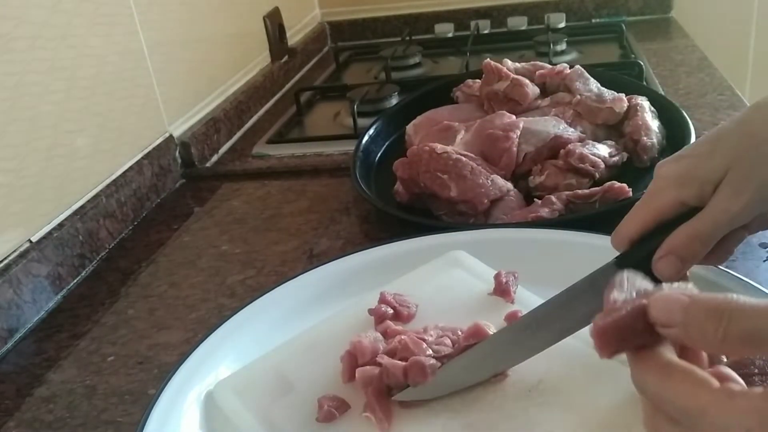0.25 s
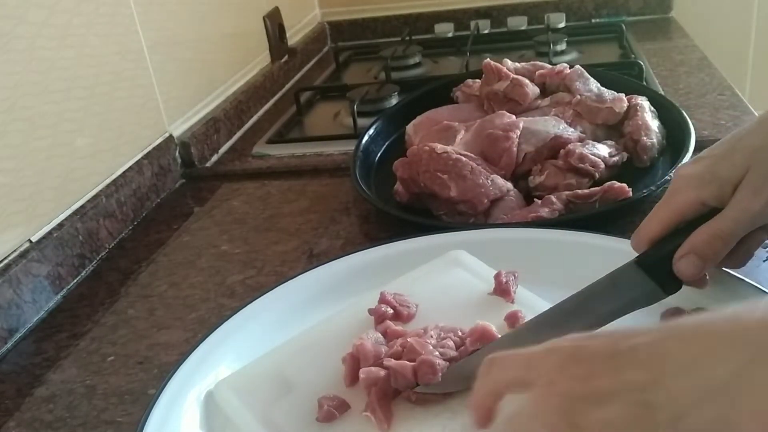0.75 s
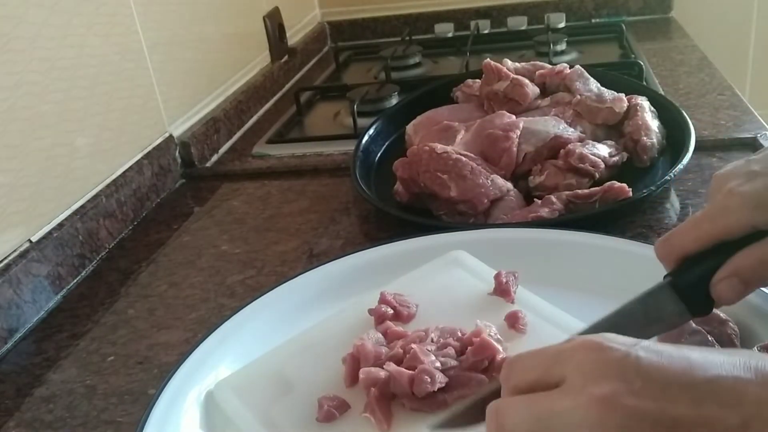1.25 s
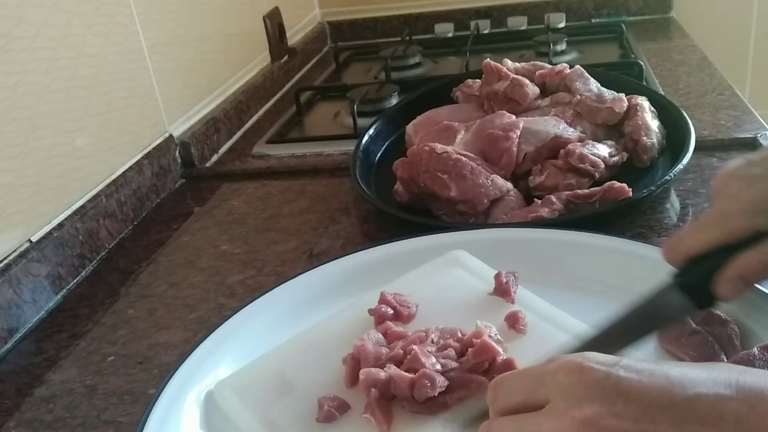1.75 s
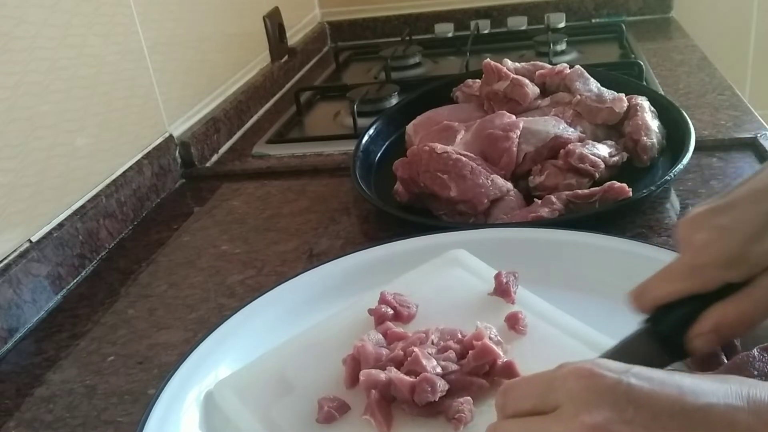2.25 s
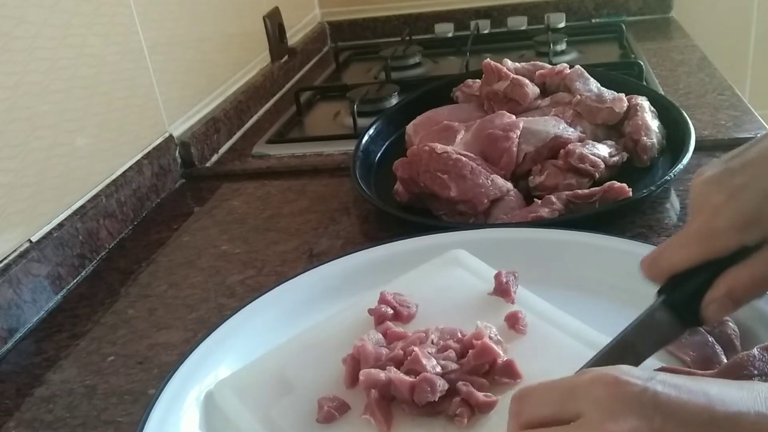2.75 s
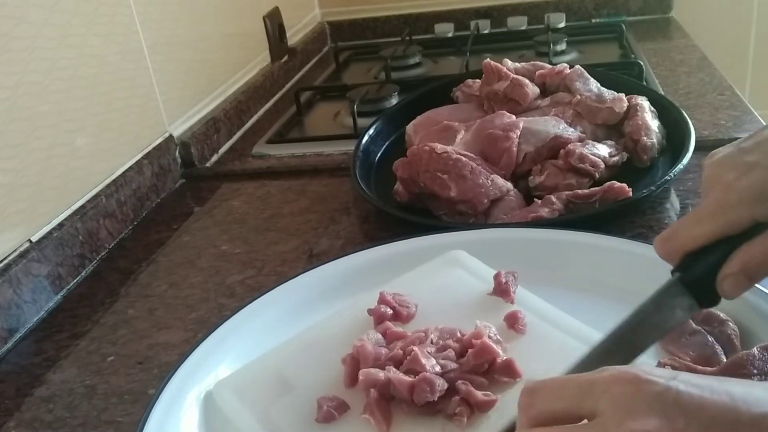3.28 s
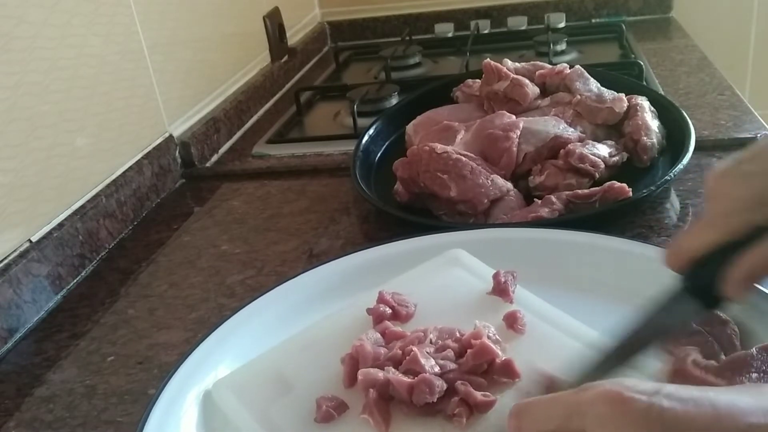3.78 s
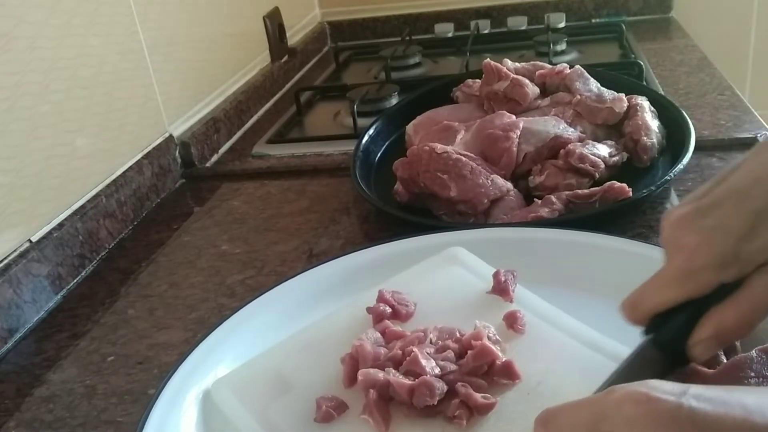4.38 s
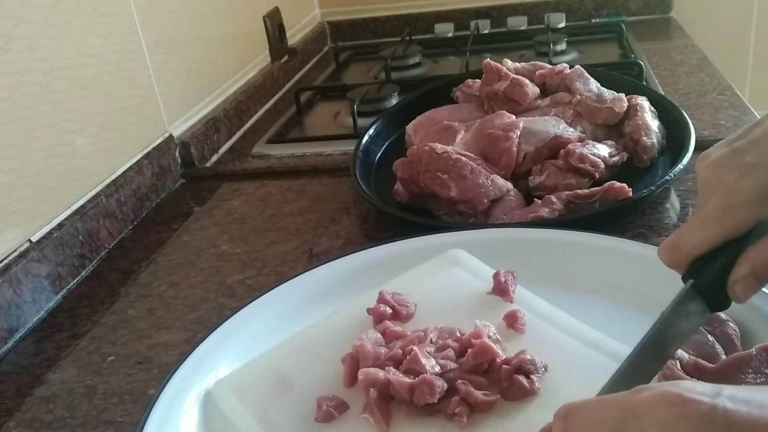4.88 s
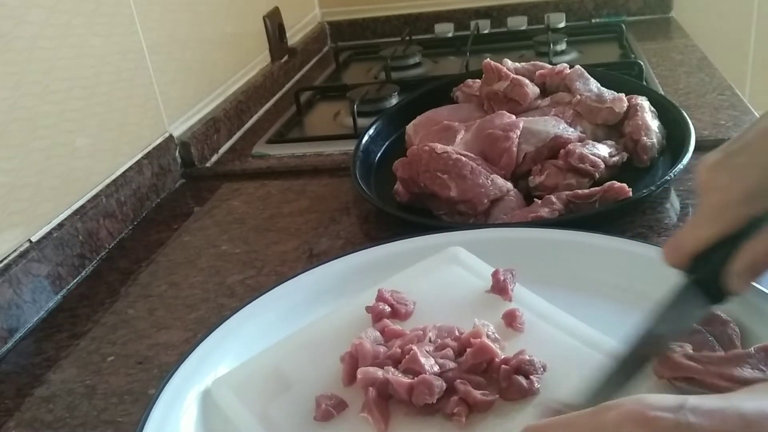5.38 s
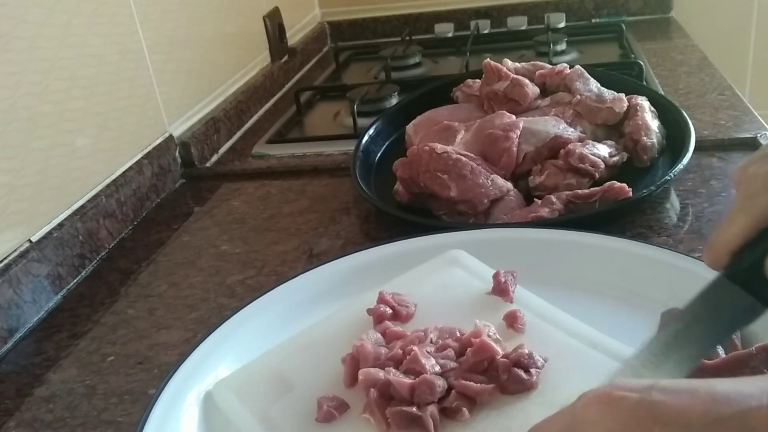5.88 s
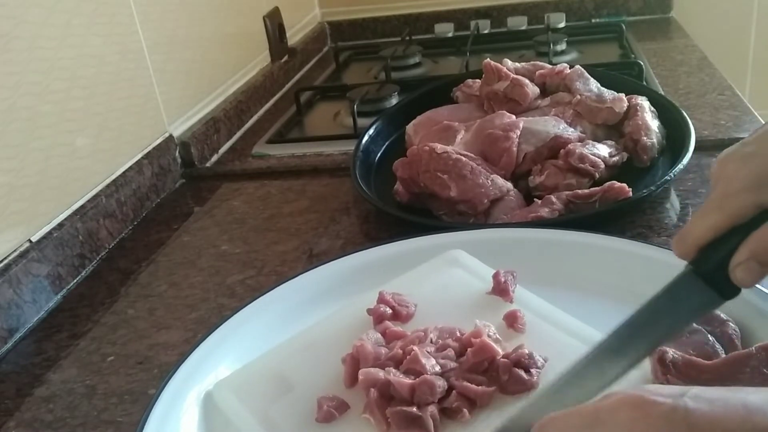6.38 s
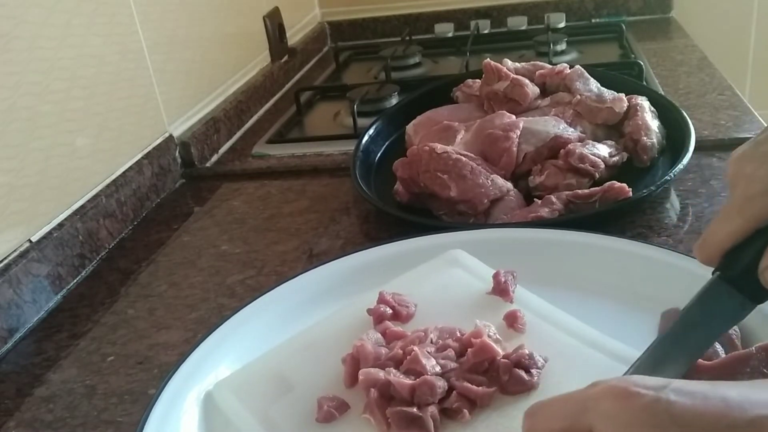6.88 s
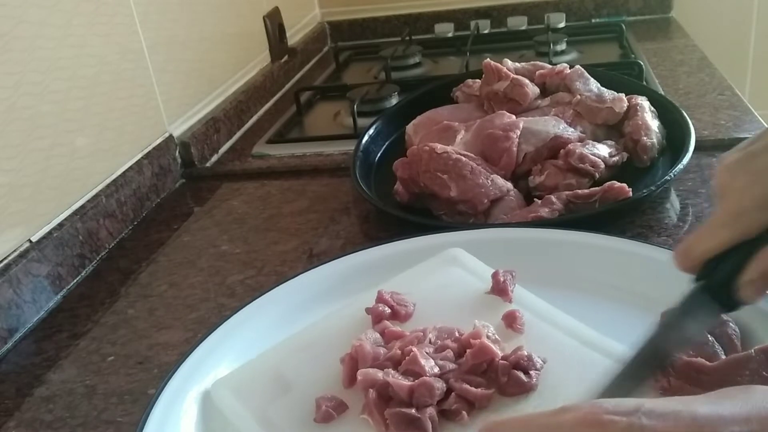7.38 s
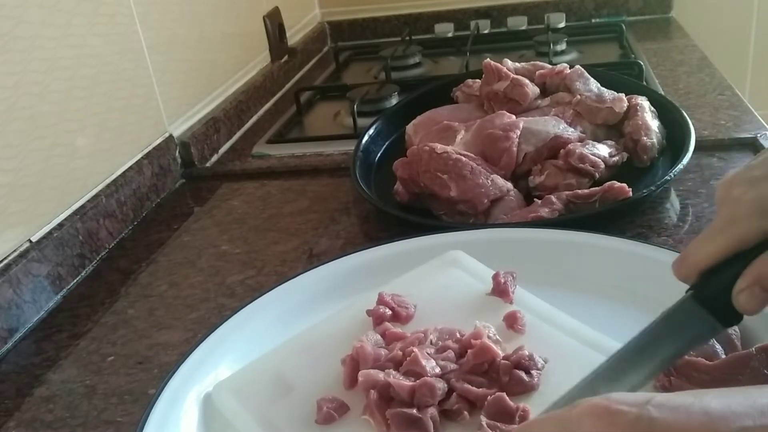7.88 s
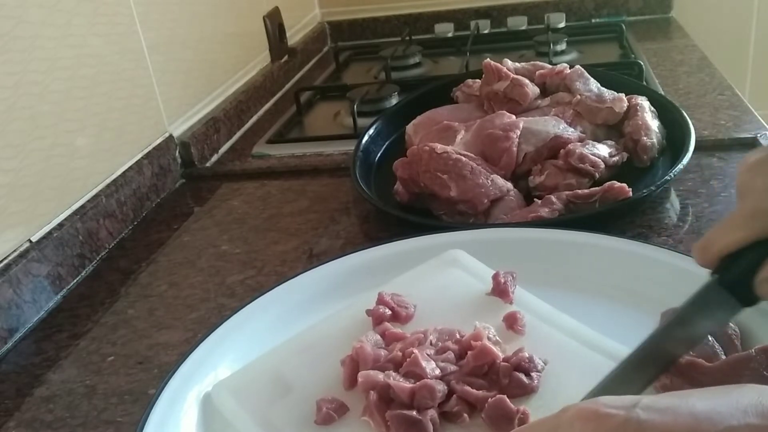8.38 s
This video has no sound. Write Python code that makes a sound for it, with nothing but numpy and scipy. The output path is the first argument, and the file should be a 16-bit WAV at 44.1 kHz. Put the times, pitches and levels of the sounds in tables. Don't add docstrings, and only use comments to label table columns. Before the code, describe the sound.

A constant low refrigerator hum with a thin whine and airy fan noise sits under close knife work. The blade knocks the board at once, then saws meat in short wet hisses, finishing in dry taps and little rattles. Soft low hand bumps come between. The cutting lulls with slight sticky rustling, then two louder chops finish it. Small hard-walled room, slightly thin phone sound.

```python
import sys
import numpy as np
from scipy import signal
from scipy.fft import rfft, irfft
from scipy.io import wavfile
from scipy.ndimage import uniform_filter1d

SR = 44100
rng = np.random.default_rng(int(sys.argv[2]) if len(sys.argv) > 2 else 0)


def ratio(d):
    e = np.asarray(d, float) / 20
    return 10 ** e


def inscribe(sig):
    pcm = np.round(np.clip(np.atleast_2d(sig).T, -1, 1) * 32767)
    wavfile.write(sys.argv[1], SR, pcm.astype(np.int16))


N = 381024
T = np.arange(N) / SR

# (full bite [s], edge chatter [dB], board minus chatter [dB],
# tray minus chatter [dB], contact [s])
BLADE_LANDINGS = [(0.012, -42, -2, 10, 0.012), (1.742, -44.5, 3, 9.5, 0.0042), (2.156, -50, -0.5, 9, 0.011),
                  (2.424, -41, 3, 3, 0.015), (2.816, -50, 5, 8, 0.0054), (3.09, -37, 4, -6, 0.012),
                  (3.485, -47.5, -6, -9, 0.014), (3.771, -39.5, -3.5, -5, 0.0072),
                  (4.596, -37.5, 1.5, -2, 0.0065), (5.046, -52.5, 10.5, 14, 0.0058),
                  (5.252, -49, -5, -23, 0.0068), (5.373, -41.5, 1.5, 2.5, 0.01),
                  (7.392, -32, -1.5, -1, 0.01), (8.436, -26.5, -2.5, 1, 0.0097)]
# (frequency [Hz], level [dB], t60 [s])
BOARD_MODES = [(630, -8, .12), (720, -12, .1), (806, -13, .08), (1071, -9, .1), (1163, -2, .1),
               (1252, -2, .1), (1343, 1, .12), (1420, -2, .1), (1520, -4, .1), (1600, -6, .1),
               (1690, -8, .09), (1840, -12, .08), (2100, -7, .1), (2300, -14, .07), (2450, -15, .07),
               (2700, -14, .1), (3180, -17, .06), (3380, -17, .06), (3670, -11, .06), (3980, -17, .06),
               (4600, -19, .05), (4980, -19, .05)]
# (frequency [Hz], level [dB], t60 [s])
TRAY_MODES = [(816, -11, 0.17), (867.6, -7.5, 0.36), (899, -1.5, 0.32), (930, -2, 0.35), (968, -7.5, 0.36),
              (994.5, -5.5, 0.33), (1070, -13, 0.31)]


def on_log(table, hz):
    f, v = np.transpose(table)
    return np.interp(np.log(np.maximum(hz, 1)), np.log(f), v)


def colour(x, table):
    n = x.shape[-1]
    return irfft(rfft(x) * ratio(on_log(table, np.fft.rfftfreq(n, 1 / SR))), n)


def unit(x):
    return x / np.sqrt(np.mean(x ** 2))


def even(x):
    return x / np.sqrt(np.mean(x ** 2, axis=1, keepdims=True))


def walk(rate):
    k = int(SR / rate)
    steps = np.repeat(rng.standard_normal(N // k + 1), k)
    return unit(uniform_filter1d(uniform_filter1d(steps, k), k)[:N])


def grit(shape, scatter_db):
    size_db = scatter_db * np.minimum(rng.exponential(size=shape), 5)
    return unit(rng.standard_normal(shape) * ratio(size_db))


def ring(modes, damp):
    hz, db, t60 = np.transpose(modes)[:, :, None]
    t = T[:SR // 2]
    chance = rng.standard_normal((2, 3, len(modes), 1))
    weight_db, detune, phase = 2.5 * chance[:, 0], 1 + 0.0035 * chance[0, 1], 2 * chance[:, 2]
    decay = ratio(db + weight_db - 60 * t / (damp * t60))
    out = (decay * np.sin(2 * np.pi * hz * detune * t + phase)).sum(axis=1)
    return out / np.sqrt((out ** 2).sum(axis=1).mean())


def add(out, sound, s):
    i = int(round(s * SR))
    part = sound[:, max(-i, 0):N - i]
    out[:, max(i, 0):i + sound.shape[1]] += part


def compressor():
    # (multiple of shaft rate [1], left [dB], right [dB])
    strong_orders = [(10, -68, -81), (11, -73, -79), (12, -64, -59), (14, -78, -76), (15, -76, -75),
                     (16, -82, -67), (18, -81, -79), (54, -69, -70), (55, -86, -69), (57, -67, -65),
                     (58, -75, -81), (61, -66, -69), (62, -66, -70), (63, -72, -70), (68, -73, -73),
                     (74, -77, -80), (75, -71, -80), (76, -75, -81), (82, -80, -78), (126, -83, -78)]
    # (frequency [Hz], level [dB])
    valve_slap = [(900, -100), (2200, -97.5), (2900, -95), (4200, -83), (5200, -96), (6300, -90),
                  (7500, -87.5), (9300, -88), (11300, -85.5), (12000, -100)]
    # (time [s], level [dB])
    shell_level = [(0, -57), (1, -55.5), (2, -54.5), (3.2, -55), (4.2, -54.5), (5, -62.5), (5.6, -60),
                   (7, -59), (8.64, -58.5)]
    shaft_hz = 48.835
    turn = (shaft_hz * T + 0.00039 * walk(1.68)) % 1
    k = np.arange(513)
    scatter = rng.standard_normal(513) + 0.34 * rng.standard_normal((2, 513))
    db = on_log(valve_slap, k * shaft_hz) + 4 * np.clip(scatter, -3, 1.3)
    db[:, :10] = -200
    for order, left, right in strong_orders:
        db[:, order] = left - .5, right - .5
    db[:, 13] = -200
    spread = np.minimum(k / 75, np.where(k < 140, 1, .5))
    angle = k / 60 * rng.standard_normal(513) + spread * rng.standard_normal((2, 513))
    strong = [row[0] for row in strong_orders]
    angle[1, strong] += .7 * (angle[0, strong] - angle[1, strong])
    cycle = irfft(ratio(db) * np.exp(1j * angle), 16384) * 8192 * np.sqrt(2)
    comb = cycle[:, (turn * 16384).astype(int)] * ratio(2.04 * walk(8.2))
    shell = ratio(np.interp(T, *np.transpose(shell_level))) * np.sqrt(2)
    shell = shell * np.cos(2 * np.pi * 13 * turn + np.array([[.2], [-.2]]))
    gas = unit(colour(rng.standard_normal((2, N)), [(2300, -13.0), (2600, -6.5), (2800, -3.5), (2990, 9.0),
                                                    (3110, -3), (3250, -22), (4000, -18.5)]))
    puffs = ratio(-59.0) * gas * (1 + 0.17 * np.cos(2 * np.pi * turn))
    return comb + shell * ratio([[-2.6], [2.1]]) + puffs


def fan():
    # (time [s], level [dB])
    blade_level = [(0.0, -53), (0.04, -49), (0.38, -53), (1.08, -51.5), (2.98, -52.5), (3.51, -58.5),
                   (3.58, -53.5), (4.71, -55.5), (5.25, -49), (5.34, -52), (8.59, -51.5), (8.64, -53)]
    # (frequency [Hz], width [Hz], level [dB])
    duct_modes = [(52.6, 3.5, -61.5), (40, 13, -78), (101.7, 16, -63.5), (150.3, 13, -63.5),
                  (198.6, 22, -62.5), (260, 32, -59.5), (299.4, 11, -58.5)]
    # (frequency [Hz], density [dB per Hz])
    air_noise = [(20, -81), (33, -75), (78, -91), (130, -80.5), (300, -88), (330, -88), (700, -93),
                 (1900, -107), (2950, -103), (3600, -104), (5200, -108), (9000, -100), (11600, -103),
                 (11900, -112), (15500, -115)]
    # (frequency [Hz], left-right correlation [0-1])
    port_likeness = [(60, .95), (200, .94), (400, .75), (1000, .2), (4500, .15), (7000, .75), (15000, .85)]
    blade_hz = 134.1
    hz = np.fft.rfftfreq(N, 1 / SR)
    power = ratio(2 * on_log(air_noise, hz))
    for centre, width, db in duct_modes:
        power = power + ratio(2 * db) / width * np.exp(-np.pi * ((hz - centre) / width) ** 2)
    like = np.clip(on_log(port_likeness, hz), 0, 1)
    mid, side = rfft(rng.standard_normal((2, N))) * np.sqrt(power * SR / 4)
    air = irfft(np.sqrt(1 + like) * mid + np.sqrt(1 - like) * side * np.array([[1], [-1]]), N)
    phase = 2 * np.pi * np.cumsum(blade_hz + 0.55 * walk(5.06)) / SR
    blade_db = np.interp(T, *np.transpose(blade_level)) + 0.68 * walk(13) + 1.25 * walk(4.5)
    blade = np.sin(phase + np.array([[.15], [0]])) * np.sqrt(2) * ratio(blade_db)
    return (air * ratio(1.0 * walk(3.27)) + blade) * ratio([[-.6], [.6]])


def thuds():
    # (time [s], peak [dB], frequency [Hz], t60 [s])
    bumps = [
        (0.751, -40, 44.6, 0.22),
        (1.63, -39, 50, .2),
        (2.3, -37, 40, 0.31),
        (4.29, -42, 45.7, .2),
        (5.03, -41, 68, .2),
        (5.05, -42.5, 105.4, 0.59),
        (8.0, -38, 48, .25),
    ]
    out, t = np.zeros((2, N)), T[:SR // 2]
    for s, db, hz, t60 in bumps:
        bump = np.sin(2 * np.pi * hz * t) * (1 - np.exp(-t / 0.0034)) * ratio(-60 * t / t60)
        add(out, ratio(db) * np.outer(ratio([-1, 1]), bump), s)
    return out


def rustles():
    # (centre [s], peak [dB], colour [Hz], length [s])
    slides = [
        (1.12, -63, 9000, .06),
        (1.3, -56, 9000, .05),
        (6.08, -46.5, 4700, 0.041),
        (6.239, -45.5, 9500, .04),
        (6.785, -48.5, 4800, 0.088),
    ]
    out, t = np.zeros((2, N)), T[:SR // 5]
    for s, db, hz, length in slides:
        rustle = grit((2, len(t)), 2.0) * np.exp(-((t - t.mean()) / length) ** 2)
        add(out, ratio(db) * colour(rustle, [(hz / 2.2, -25), (hz, 0), (hz * 1.36, -20)]), s - t.mean())
    return out


def ticks():
    # (time [s], peak [dB], colour [Hz])
    edge_ticks = [(0.012, -20, 1790), (.587, -38, 9000), (.7225, -45, 5000), (0.7416, -22, 2500),
                  (1.4563, -22.5, 10000), (1.6, -30, 4000), (1.7405, -27, 1800), (2.1238, -27.5, 8400),
                  (2.424, -26, 2000), (3.088, -22, 1800), (3.0965, -31, 2200), (3.768, -41, 2500),
                  (4.593, -28, 1800), (4.599, -37, 2200), (5.041, -36, 2000), (5.047, -40, 2000),
                  (5.375, -36, 2000), (7.014, -35, 8500), (7.3942, -21, 2000), (8.4325, -21, 2000)]
    out, t = np.zeros((2, N)), T[:SR // 5]
    for s, db, hz in edge_ticks:
        noise = rng.standard_normal(len(t)) + .5 * rng.standard_normal((2, len(t)))
        click = noise * (np.exp(-t / .001) + .12 * np.exp(-t / .008))
        tone = [(hz / 16, -45), (hz / 4, -16), (hz, 0), (hz * 3.7, -9), (hz * 5.7, -25)]
        add(out, ratio(db - 2.5) * colour(click, tone)[:, :SR // 10], s)
    return out


def sawing():
    # (fastest moment [s], fibre hiss [dB], board rumble minus hiss [dB],
    # speed-up [s], slow-down [s])
    strokes = [(0.749, -45.5, -1, 0.013, 0.012), (.795, -50.5, -6, 0.036, 0.032),
               (.92, -60, -2, 0.071, .08), (1.46, -50.5, -14, .015, 0.029), (1.505, -53.5, 2, 0.019, .03),
               (1.605, -44.5, -11, 0.053, 0.059), (2.15, -46, -3.5, 0.032, 0.042),
               (2.27, -44.5, -8.5, 0.038, .075), (2.812, -46, -0.5, 0.037, 0.035),
               (2.95, -46, -13, 0.092, 0.072), (3.486, -45.5, -2, 0.056, 0.029),
               (3.61, -45, -10.5, 0.048, 0.073), (4.296, -42.5, -9, 0.037, 0.033),
               (4.45, -45, -8.5, 0.073, 0.078), (5.042, -45.5, 0.5, .04, 0.031),
               (5.24, -47, -7.5, 0.1, 0.083), (7.07, -52.5, -8, 0.046, .035), (7.21, -44, -9, .05, 0.049),
               (8.085, -51.5, -7.5, 0.033, 0.033), (8.27, -50, -3, 0.091, 0.05)]
    # (frequency [Hz], density [dB per Hz])
    fibre_colour = [(800, -4), (2400, -4), (3500, -4), (6700, -2.5), (8600, 2.5), (11500, -5),
                    (15500, -13.5)]
    point, drop_db = 1.93, -8.5
    dive_db, dive_s = -9.5, 0.017
    hiss, rub = np.zeros((2, N))
    for s, hiss_db, board_db, rise, fall in strokes:
        u = np.abs(T - s) / np.maximum(np.where(T < s, rise, fall), .003)
        speed = ratio(hiss_db + drop_db * u ** point)
        hiss = hiss + speed
        rub = rub + ratio(board_db) * speed
    for s, db, *_ in BLADE_LANDINGS:
        hiss = hiss + ratio(db + dive_db) * np.exp(np.minimum(T - s, 0) / dive_s) * (T < s)
    hiss = uniform_filter1d(hiss, 300) * ratio(2.33 * walk(40) + 1.75 * walk(150))
    rub = uniform_filter1d(rub, 300) * ratio(2.33 * walk(40) + 1.75 * walk(150))
    body = ring(BOARD_MODES, 0.88) + ratio(-4) * ring(TRAY_MODES, 0.61)
    board = signal.fftconvolve(rub * grit((1, N), 4.1), body, axes=1)[:, :N]
    fibres = unit(colour(grit((2, N), 2.9), fibre_colour))
    return hiss * fibres * ratio(1.5) + board * ratio(-0.5)


def landings():
    # (frequency [Hz], density [dB per Hz])
    chatter_colour = [(250, -58), (600, -11), (1500, -9.5), (2650, -12), (3900, -11.5), (7400, -14),
                      (8700, -11), (12000, -21), (15500, -29)]
    lead, blow_lead = .04, .005
    drag_base_db, drag_per_db, usual_db = -13, 0.5, -39.5
    held_s, held_db = .066, -11
    out = np.zeros((2, N))
    t = T[:SR // 4] - lead
    slips = ratio(0.37 * walk(70))
    for s, db, board_db, tray_db, contact in BLADE_LANDINGS:
        u = t / np.clip(contact, .003, .05)
        attack = np.exp(-(u / 0.85) ** 2) + 0.046 * np.exp(u / 0.66)
        bite = np.where(u < 0, attack, np.exp(-(np.abs(u) / 1.06) ** 2))
        drag = ratio(drag_base_db + drag_per_db * (db - usual_db)) * np.clip(u, 0, 1) / (1 + (t / 0.042) ** 4)
        drag = drag * slips[int(s * SR / 2):][:len(t)]
        clicks = grit((3, len(t)), 2.1)
        blow = clicks[2:] * (bite ** 1.85 + 0.68 * drag)
        board = even(signal.fftconvolve(blow, ring(BOARD_MODES, 0.54), axes=1)[:, :len(t)])
        tray = even(signal.fftconvolve(blow, ring(TRAY_MODES, 1.0), axes=1)[:, :len(t)])
        mute = ratio(held_db * (s < held_s) * np.clip((t + s - held_s) / .012, 0, 1))
        tray = tray * mute * np.clip((t[-1] - t) / lead, 0, 1)
        chatter = even(colour(clicks[:2] * (bite + drag), chatter_colour))
        add(out, ratio(db - 6.0) * chatter, s - lead + .002)
        body = ratio(board_db) * board + ratio(tray_db - 3.5) * tray
        add(out, ratio(db - 5) * body, s - lead - blow_lead)
    return out


def kitchen(x):
    t60, level_db = 0.4, -11.5
    t = T[:SR // 2]
    tail = rng.standard_normal((2, len(t))) * (1 - np.exp(-t / 0.0039))
    dull = colour(tail, [(300, 18), (1000, 4.5), (4000, 10.0), (9000, -10)])
    tail = dull * ratio(-60 * t / t60) + 1.7 * tail * ratio(-60 * t / (1.51 * t60))
    tail = tail / np.sqrt((tail ** 2).sum(axis=1, keepdims=True))
    return x + ratio(level_db) * signal.fftconvolve(x, tail, axes=1)[:, :N]


def ports(x):
    # (frequency [Hz], level [dB])
    side_width = [(300, 0), (1000, -2), (4000, -1), (7000, -5), (10000, -5.5), (15000, -3)]
    # (frequency [Hz], level [dB])
    port_balance = [(500, 0), (2000, 0.1), (4000, 0), (8000, -2.5), (13000, 0.5)]
    mid, side = x[0] + x[1], colour(x[0] - x[1], side_width)
    hz, db = np.transpose(port_balance)
    left = colour(mid + side, np.transpose([hz, db / 2]))
    right = colour(mid - side, np.transpose([hz, -db / 2]))
    return np.array([left, right]) / 2


def scene():
    knife = landings() + ticks() + rustles() + sawing()
    return ports(kitchen(knife)) + thuds() + compressor() + fan()


def starve(x, depth_db):
    thin_bands = [3900, 4300, 4700, 5150, 5500, 6650, 7200, 7600, 10050, 11850, 12300, 13400, 14500]
    top_hz = 15830
    loud_db, loud_top_hz, loud_frames = -27, 14300, 7
    hz, s, z = signal.stft(x, SR, nperseg=2048)
    chance = rng.standard_normal((len(hz) // 8 + 1, len(s)))
    luck = np.repeat(uniform_filter1d(chance, size=4, axis=1), 8, axis=0)[:len(hz)]
    thin = np.exp(-((hz[:, None] - thin_bands) / 180) ** 2).sum(axis=1)
    thin = thin + .2 * (hz > 11500) - 9 * (hz < 3150)
    lost = 1 / (1 + np.exp((luck + .9 - .75 * thin[:, None]) / .06))
    power = (np.abs(z) ** 2).mean(axis=0)
    strong = power / (uniform_filter1d(power, size=24, axis=0) + 1e-18)
    loud = power.sum(axis=0) * 4 / 3 > ratio(2 * loud_db)
    spent = np.convolve(loud, np.ones(loud_frames))[:len(s)]
    gain = ratio(depth_db * lost)
    gain = gain * np.where(hz[:, None] > 3150, strong ** 0.26, 1)
    gain = gain * (hz[:, None] < np.where(spent > 0, loud_top_hz, top_hz))
    return signal.istft(z * gain, SR, nperseg=2048)[1][:, :N]


def band_limit(x):
    return signal.sosfilt(signal.butter(12, 15890, fs=SR, output="sos"), x)


def record(dry):
    thinned = starve(dry, depth_db=-28)
    return band_limit(thinned)


dry = scene()
out = record(dry)
inscribe(out)
```